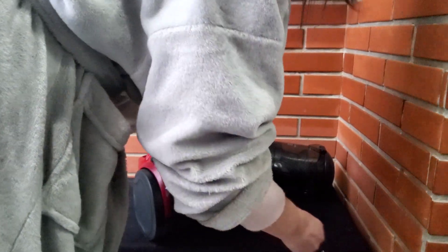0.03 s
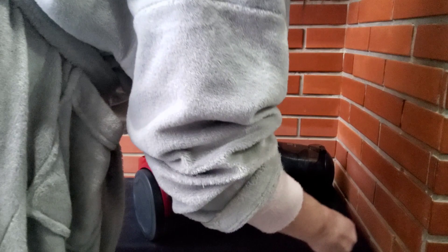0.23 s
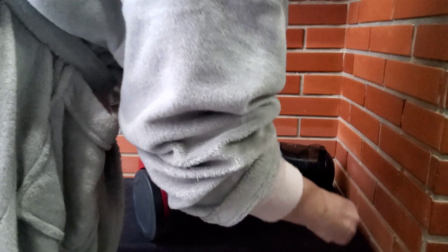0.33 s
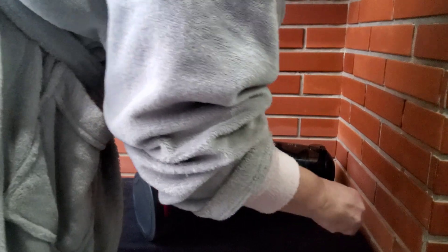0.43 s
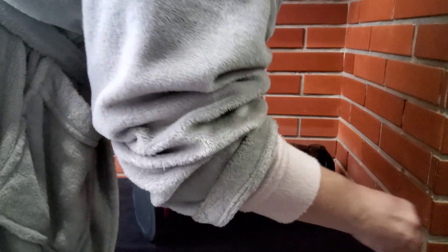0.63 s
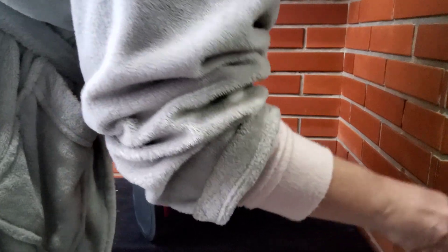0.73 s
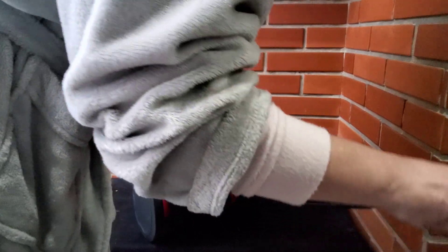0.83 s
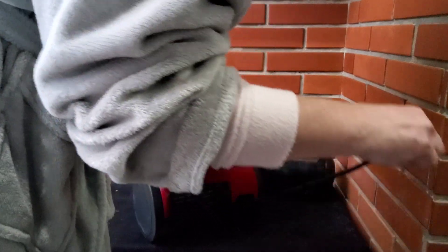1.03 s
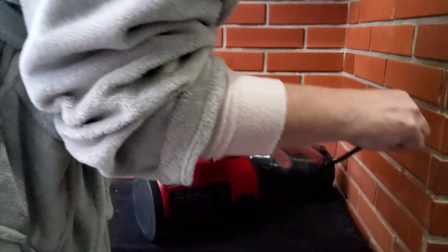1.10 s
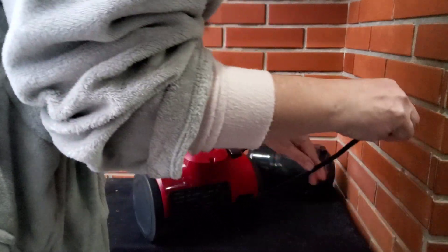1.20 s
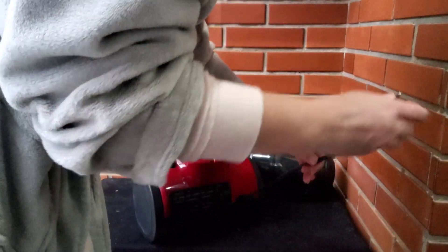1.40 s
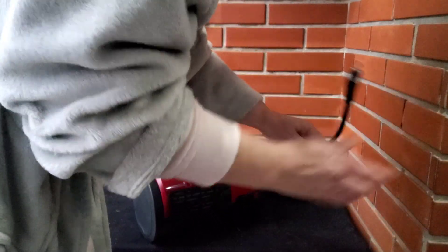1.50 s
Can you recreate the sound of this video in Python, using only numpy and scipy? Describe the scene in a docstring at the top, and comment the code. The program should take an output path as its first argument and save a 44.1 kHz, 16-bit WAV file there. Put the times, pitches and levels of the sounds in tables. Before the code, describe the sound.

Dull handling bumps and a dry scrape as a vacuum cleaner's cord is pulled out.

```python
"""Two dull, hollow clusters of bumps and a dry scrape: a power cord is tugged out of a canister
vacuum cleaner in a brick corner. The bumps are handling noise close to the microphone;
the reel sticks and slips as it turns, while cord and fleece sleeve swish and tick.
Then the pull ends, leaving a faint squeak and the low hum of the room."""
import sys
import numpy as np
from scipy import signal
from scipy.fft import rfft, irfft, next_fast_len
from scipy.io import wavfile
from scipy.ndimage import map_coordinates

SR = 44100
rng = np.random.default_rng(int(sys.argv[2]) if len(sys.argv) > 2 else 0)


def waveform_to_disk(signal):
    """Save audio, clipped to [-1, 1], as 16-bit WAV at the path in sys.argv[1]."""
    frames = np.transpose(np.atleast_2d(signal))
    scaled = np.clip(frames, -1, 1) * 32767
    samples = np.round(scaled).astype(np.int16)
    wavfile.write(sys.argv[1], SR, samples)


N = 68355


def bumps():
    """Dull, hollow handling bumps close to the microphone, each with a deep thud."""
    # (time [s], ring level [dB], main ring pitch [Hz], thud level [dB])
    hits = [(0.2068, -15.5, 164.2, -24.5), (0.2128, -23.5, 150.3, -34), (0.2272, -17, 184.3, -35),
            (0.2431, -22, 202, -58), (0.292, -23.5, 196, -37), (0.309, -24.5, 151, -39.5),
            (0.3903, -6.5, 170, -34), (0.4023, -5.5, 157.7, -13), (0.4196, -14.5, 192, -20),
            (0.452, -25.5, 139, -33), (0.4734, -20.5, 203, -19), (0.506, -21.5, 147.6, -38),
            (0.535, -31.5, 138, -40)]
    # other modes of a bump (pitch [Hz], level against the main ring [dB], t60 [s])
    bump_modes = [(133.5, -10.5, 0.24), (237.1, -13, 0.213), (270.6, -33, 0.22), (408.7, -24, 0.11),
                  (475, -20, 0.11), (632, -32, 0.12), (727.5, -24.5, 0.11)]
    # deep modes under a bump (pitch [Hz], level against the thud level [dB], t60 [s])
    thud_modes = [(49.06, 2, 0.28), (65.5, 1, 0.11)]
    main_t60_s, left_lag_s = 0.12, 0.00025
    out = 0
    for start, db, hz, thud_db in hits:
        knock = ring(start, [(hz, 0, main_t60_s)] + bump_modes, attack_s=0.0065)
        thud = ring(start, thud_modes, attack_s=0.0091)
        out += amp(db) * knock + amp(thud_db) * thud
    delay_s = np.array([[0.5], [-0.5]]) * left_lag_s
    return pan(filtered(out, lambda hz: np.exp(-2j * np.pi * hz * delay_s)), left_db=0.15)


def reel():
    """Tiny slips of the turning reel excite its resonances over a broad rasp."""
    # (time [s], scrape level [dB], resonance emphasis [dB])
    pull = [(0, -47.5, -18), (0.026, -45.5, 2.5), (0.036, -47, -2), (0.07, -43.5, -1), (0.105, -48, -1),
            (0.16, -43.5, 1), (0.195, -41, -7), (0.222, -33.5, -3), (0.255, -47.5, 7.5), (0.3, -45, -9),
            (0.365, -44, -19), (0.405, -34, -10.5), (0.46, -43.5, -3), (0.54, -49, -3.5), (0.61, -43, -0.5),
            (0.66, -44, -2.5), (0.71, -43.5, 7.5), (0.745, -44, -2.5), (0.797, -40, 4), (0.845, -50, -7),
            (0.875, -47.5, -0.5), (0.92, -60, -8.5), (1.04, -74.5, -1.5), (1.12, -66, -6),
            (1.18, -66.5, 0.5), (1.23, -69.5, -7), (1.55, -82.5, -3.5)]
    # reel resonances (centre [Hz], width [Hz], relative level [dB])
    modes = [(458.3, 51, 0.5), (547.6, 36.5, -1), (700, 74, -15.5), (869, 50, -3.5), (1059, 45.4, -1),
             (1400, 460, -17.5), (1720, 83, -13.5), (2350, 82, -27), (3535, 170, -22), (4230, 200, -25.5)]
    # (frequency [Hz], relative level [dB])
    rasp_colour = [(60, -5.5), (200, -2.5), (350, 0.5), (700, -5.5), (1200, -8.5), (2200, -13),
                   (3500, -25.5), (6000, -29), (15000, -36)]

    def shell(hz):
        return sum((-1) ** k * amp(db) * 1j * hz * width / (centre ** 2 - hz ** 2 + 1j * hz * width)
                   for k, (centre, width, db) in enumerate(modes))

    level_db, emphasis_db = curves(pull)
    rings = spread(slips(per_s=1500, spread_db=3), shell)
    rasp = spread(slips(per_s=5000, spread_db=2), eq(rasp_colour))
    scrape = amp(emphasis_db - 1) * rings + amp(-1.5) * rasp
    return pan(amp(level_db) * scrape, left_db=-0.87)


def chatters():
    """Fast stick-slip locks onto a reel resonance: a brief hollow tone in a dry scuff."""
    # (peak time [s], level [dB], pitch [Hz], half length [s], scuff against the tone [dB])
    grips = [(0.053, -43, 532, 0.026, 0), (0.189, -35, 474, 0.0091, -25), (0.677, -40, 460, 0.013, -20),
             (0.796, -39.5, 536, 0.022, -6.5), (0.987, -65.5, 498, .012, -10), (1.169, -67, 541, 0.034, -2)]
    # (frequency [Hz], relative level [dB])
    scuff_colour = [(150, -24), (400, -12.5), (650, -6), (850, 5), (1080, -0.5), (1300, -0.5), (1800, -6),
                    (2600, -25.5), (6000, -42)]
    roughness_rad, overtone_db, squareness = 0.6, -11.5, 3.8
    t, out = clock(), 0
    scuff = spread(slips(per_s=2700, spread_db=4.5), eq(scuff_colour))
    for peak, db, hz, half_length, scuff_db in grips:
        phase = 2 * np.pi * hz * t + roughness_rad * wobble(per_s=180)
        tone = np.sqrt(2) * (np.sin(phase) + amp(overtone_db) * np.sin(2 * phase))
        envelope = np.exp(-np.abs((t - peak) / half_length) ** squareness)
        out += amp(db) * envelope * (tone + amp(scuff_db) * scuff)
    return out


def swishes():
    """Fine friction of cord and fleece sleeve swells, holds and fades with each stroke."""
    # (peak time [s], level [dB], 20 dB rise [s], hold [s], 20 dB fall [s], added tilt [dB/octave])
    strokes = [(0.215, -45.5, 0.028, 0.0081, 0.03, 4), (0.251, -42.5, .025, 0.015, 0.058, -2),
               (0.322, -48, 0.23, 0.012, 0.13, 1.5), (0.404, -40, 0.041, 0.011, 0.034, 4),
               (0.471, -44.5, 0.0091, 0.009, 0.048, -4.5), (0.659, -48, 0.0093, 0.019, 0.071, 2),
               (0.787, -39.5, 0.025, 0.014, 0.031, 3.5), (0.784, -48, 0.075, 0.013, 0.094, -4.5),
               (0.878, -55.5, 0.0069, 0.0086, 0.024, 6)]
    # (frequency [Hz], relative level [dB])
    colour = [(500, -12), (1500, 0), (2800, 1.5), (4300, 3), (6500, -1.5), (8500, -3.5), (10300, 0),
              (12500, -8.5), (15500, -9.5)]
    t, out = clock(), 0
    for peak, db, rise, hold, fall, tilt_db in strokes:
        before, after = (peak - t - hold / 2) / rise, (t - peak - hold / 2) / fall
        fade_db = -20 * np.maximum(np.maximum(before, after), 0)
        fibres = slips(per_s=7700, spread_db=1)
        grain = spread(fibres, lambda hz: amp(along(colour, hz) + tilt_db * np.log2(hz + 1)))
        out += amp(db + fade_db) * grain
    return pan(out, left_db=-0.6)


def catches():
    """The cord snags and frees itself with a tiny bright tick."""
    # (time [s], level [dB])
    snags = [(0.217, -35), (0.2356, -34), (0.2512, -31.5), (0.3982, -37), (0.4057, -31)]
    # (frequency [Hz], relative level [dB])
    colour = [(1000, -2), (3000, -14), (5400, 5), (8000, 0), (11000, -8.5), (15500, -12)]
    t = clock()
    envelope = sum(amp(db) * (t >= start) * decay(np.abs(t - start), t60_s=0.01) for start, db in snags)
    return envelope * noise(colour)


def rumble():
    """A low handling rumble swells with the bumps and fades after the pull."""
    # (time [s], level [dB])
    swells = [(0, -58), (0.18, -61), (0.205, -33), (0.32, -36.5), (0.355, -53), (0.385, -27), (0.48, -32.5),
              (0.57, -48), (0.68, -48.5), (0.83, -48.5), (0.95, -59), (1.05, -61.5), (1.55, -68)]
    # (frequency [Hz], relative level [dB])
    colour = [(25, -29), (48, 4.5), (90, -1.5), (130, -5.5), (250, -9.5), (340, -16), (600, -25.5),
              (2000, -78)]
    level_db, = curves(swells)
    return amp(level_db) * noise(colour)


def squeak():
    """A thin, unsteady squeak after the pull: a narrow band of noise gliding in pitch."""
    # (time [s], pitch [Hz], level [dB])
    glide = [(1.03, 3160, -99), (1.06, 3280, -80), (1.094, 3140, -76), (1.135, 3210, -79.5),
             (1.165, 3330, -80), (1.19, 3270, -81), (1.245, 3070, -77.5), (1.29, 3070, -85),
             (1.43, 3100, -99)]
    hz, db = curves(glide)
    carrier = np.exp(2j * np.pi * np.cumsum(hz) / SR)
    flutters = [wobble(per_s=250) + 1j * wobble(per_s=250) for _ in range(2)]
    return amp(db) * np.array([unit((carrier * flutter).real) for flutter in flutters])


def room_tone():
    """A slightly wavering hum eases after the pull, over the steady air of the room."""
    # (pitch [Hz], base level [dB])
    partials = [(48.4, -70), (113, -59.5), (170, -78)]
    # fader on the hum (time [s], gain [dB])
    fader = [(0, 10), (0.85, 9.5), (1.0, 2), (1.55, -2)]
    # (frequency [Hz], relative level [dB])
    air_colour = [(20, 6), (45, 12), (80, -1.5), (150, -18), (250, -14.5), (450, -37.5), (900, -35.5),
                  (1700, -23), (2600, -45), (6000, -45.5), (10500, -39), (15500, -42)]
    waver_db, air_db = 1.0, -55.5
    gain_db, = curves(fader)
    hum = 0
    for hz, db in partials:
        level = amp(db + gain_db + waver_db * wobble(per_s=5))
        hum += level * np.sqrt(2) * np.sin(2 * np.pi * hz * clock())
    return hum + amp(air_db) * noise(air_colour)


def brick_corner(send):
    """A short reverb off the bricks; each frequency dies at its own speed."""
    # (frequency [Hz], t60 [s])
    decay_times = [(100, 0.19), (600, 0.18), (3000, 0.12), (12000, 0.15)]
    hz, t, spectrum = signal.stft(rng.standard_normal((2, SR // 2)), SR, nperseg=256)
    _, tail = signal.istft(spectrum * decay(t, along(decay_times, hz)[:, None]), SR, nperseg=256)
    return signal.fftconvolve(send, tail / np.linalg.norm(tail[0]), axes=1)[:, :N]


def amp(db):
    """Decibels to gain."""
    return 10 ** (np.asarray(db) / 20)


def unit(x):
    """Scale to rms 1."""
    return x / np.sqrt(np.mean(x ** 2) + 1e-20)


def pan(x, left_db):
    """Opposite gains on left and right."""
    return x * amp([[left_db], [-left_db]])


def clock():
    """Time of every sample."""
    return np.arange(N) / SR


def decay(t, t60_s):
    """A fade of 60 dB every t60_s."""
    return np.exp(-np.log(1000) * t / t60_s)


def curves(rows):
    """One value per sample for each column after the time."""
    times, *columns = np.transpose(rows)
    return [np.interp(clock(), times, column) for column in columns]


def along(points, hz):
    """Interpolate (frequency [Hz], value) points on a log axis."""
    knots_hz, values = np.transpose(points)
    return np.interp(np.log(hz + 1), np.log(knots_hz + 1), values)


def eq(colour):
    """Frequency response through (frequency [Hz], level [dB]) points."""
    return lambda hz: amp(along(colour, hz))


def wobble(per_s):
    """A smooth random curve with per_s knots a second."""
    return map_coordinates(rng.standard_normal(4096), [clock() * per_s], mode="wrap")


def filtered(x, response):
    """Pass x through a complex frequency response."""
    size = next_fast_len(N + SR // 2)
    return irfft(rfft(x, size) * response(np.fft.rfftfreq(size, 1 / SR)), size)[..., :N]


def spread(pair, response):
    """Two unrelated signals, coloured and mixed to stereo at rms 1: narrow bass, wide treble."""
    # (frequency [Hz], left-right correlation [-1 to 1])
    likeness = [(60, 0.88), (290, 0.93), (640, 0.58), (1100, -0.27), (3100, 0.11), (15000, -0.096)]

    def mid_side(hz):
        angle = np.arccos(along(likeness, hz)) / 2
        return response(hz) * np.array([np.cos(angle), np.sin(angle)])

    mid, side = filtered(pair, mid_side)
    return unit(np.array([mid + side, mid - side]))


def noise(colour):
    """Coloured stereo noise at rms 1."""
    return spread(rng.standard_normal((2, N)), eq(colour))


def slips(per_s, spread_db):
    """Two trains of tiny random stick-slip impulses."""
    hits = rng.random((2, N)) < per_s / SR
    polarity = np.sign(rng.standard_normal((2, N)))
    return hits * polarity * amp(spread_db * rng.standard_normal((2, N)))


def ring(start, modes, attack_s):
    """Damped modes with a soft attack."""
    t = np.maximum(clock() - start, 0)
    tones = sum(amp(db) * decay(t, t60) * np.sin(2 * np.pi * hz * t) for hz, db, t60 in modes)
    return (1 - np.exp(-t / attack_s)) * tones


def scene():
    """Bumps and friction feed the corner's reverb; rumble, squeak and room tone stay dry."""
    bump_send_db, friction_send_db = -15, -16
    knocks = bumps()
    friction = reel() + chatters() + swishes() + catches()
    send = amp(bump_send_db) * knocks + amp(friction_send_db) * friction
    return knocks + friction + rumble() + brick_corner(send) + squeak() + room_tone()


def record(dry):
    """Roll off the deepest bass and cut the very top."""
    low_cut_hz, top_hz = 35.5, 15700
    return filtered(dry, lambda hz: (hz < top_hz) * hz ** 4 / np.sqrt(hz ** 8 + low_cut_hz ** 8))


dry = scene()
out = record(dry)
waveform_to_disk(out)
```